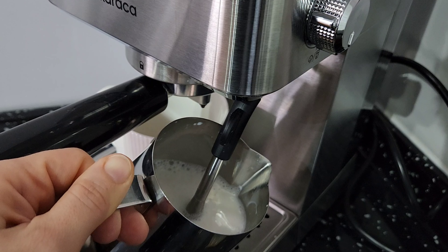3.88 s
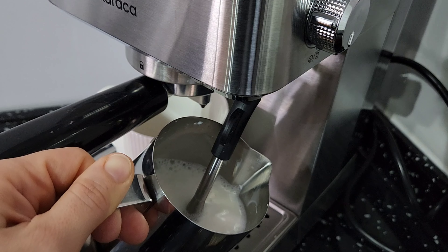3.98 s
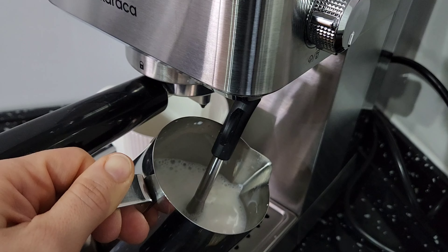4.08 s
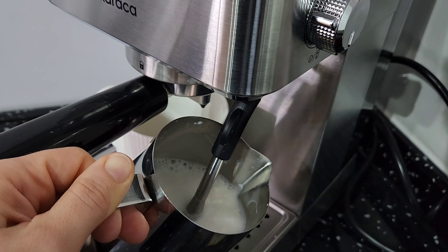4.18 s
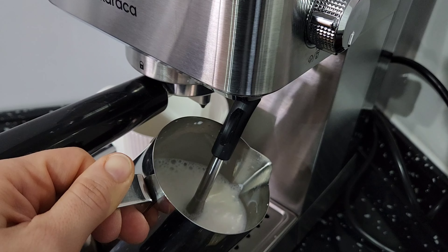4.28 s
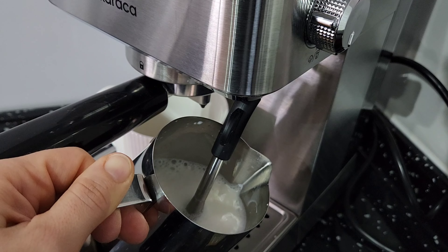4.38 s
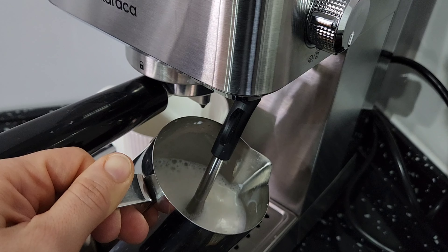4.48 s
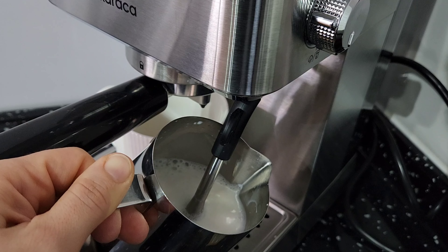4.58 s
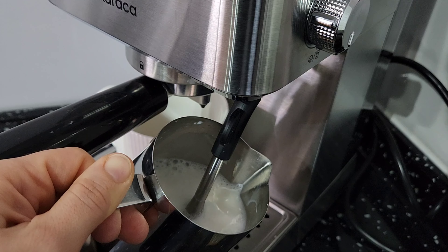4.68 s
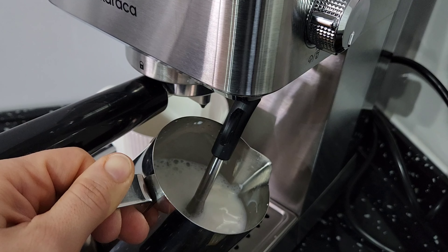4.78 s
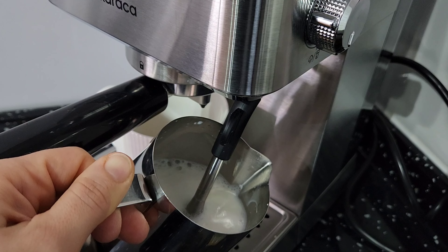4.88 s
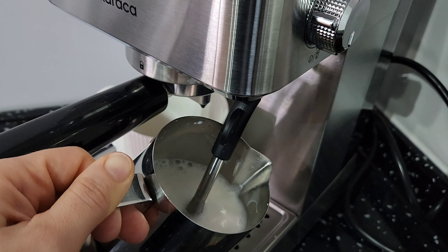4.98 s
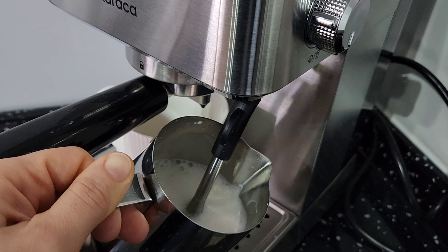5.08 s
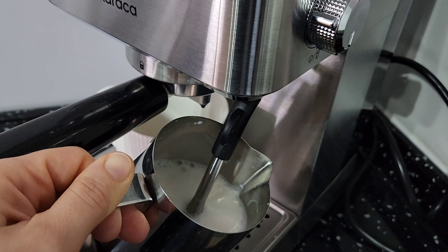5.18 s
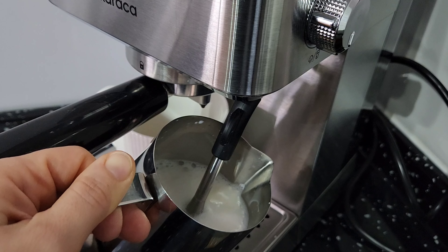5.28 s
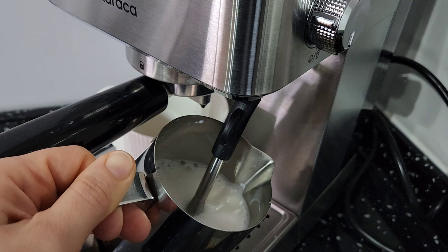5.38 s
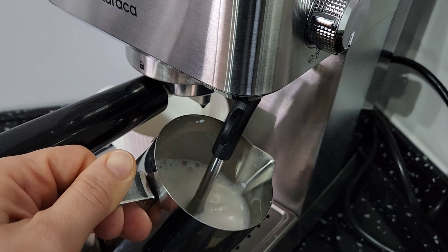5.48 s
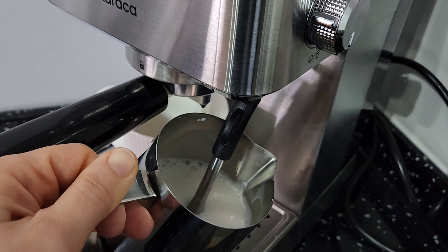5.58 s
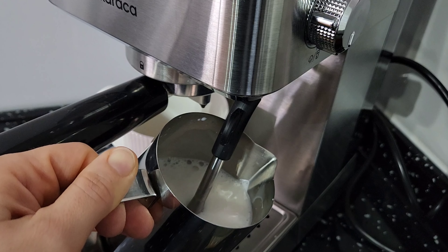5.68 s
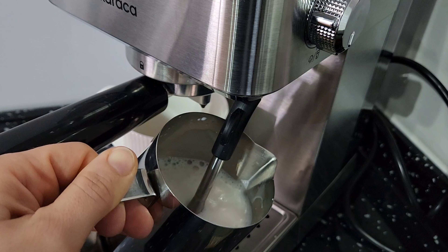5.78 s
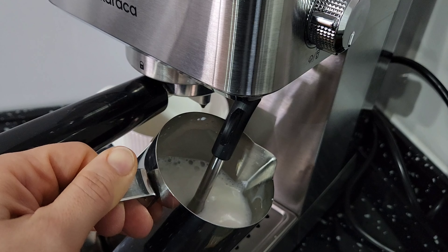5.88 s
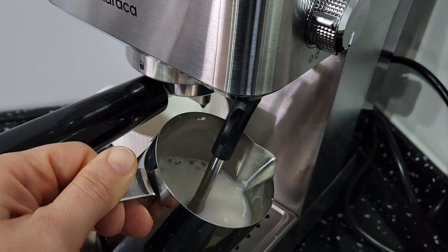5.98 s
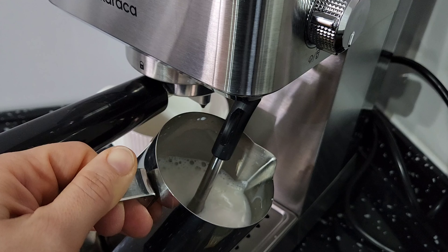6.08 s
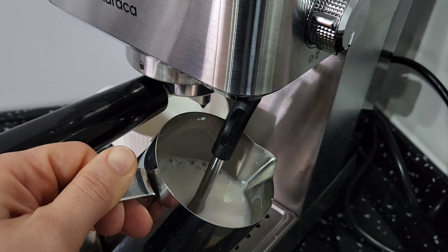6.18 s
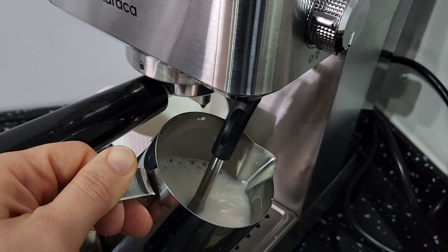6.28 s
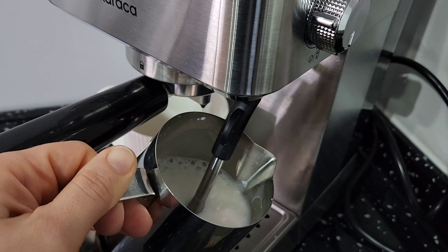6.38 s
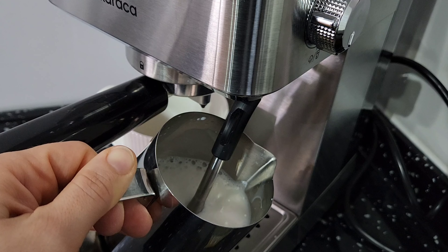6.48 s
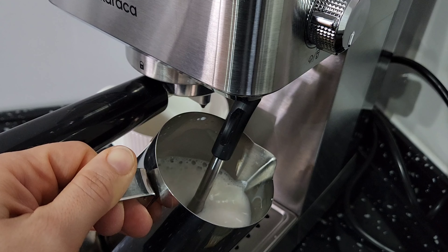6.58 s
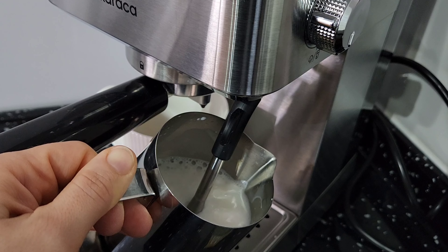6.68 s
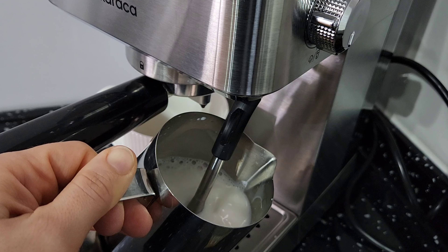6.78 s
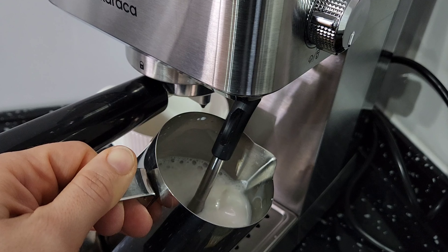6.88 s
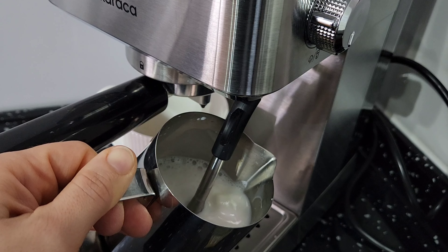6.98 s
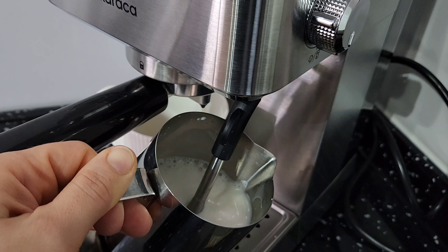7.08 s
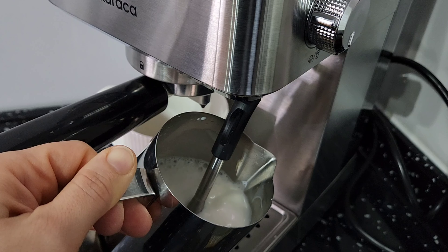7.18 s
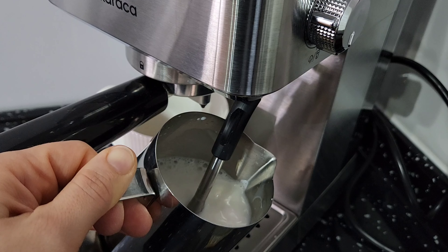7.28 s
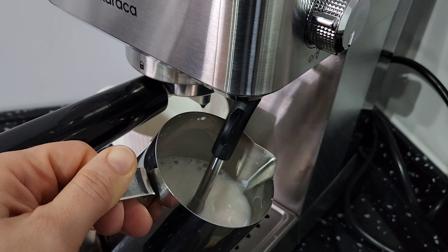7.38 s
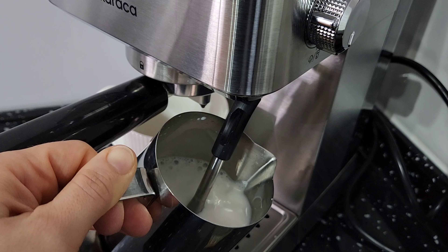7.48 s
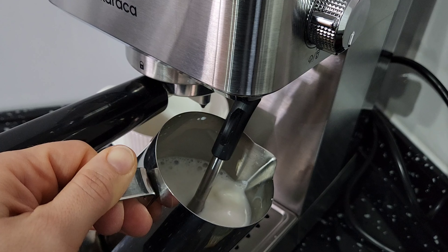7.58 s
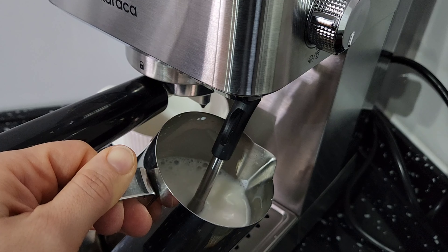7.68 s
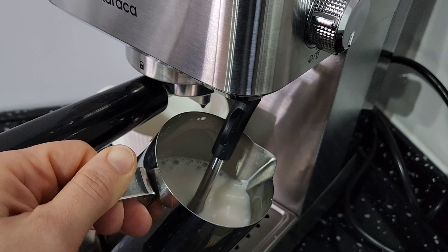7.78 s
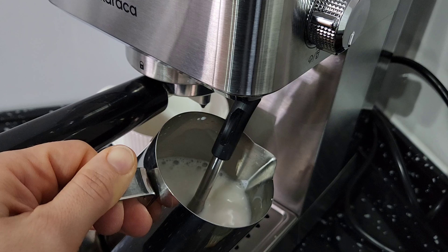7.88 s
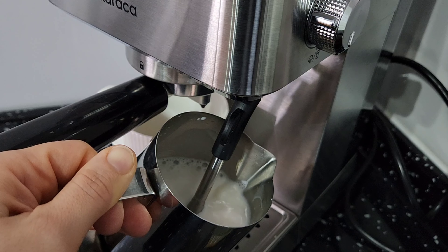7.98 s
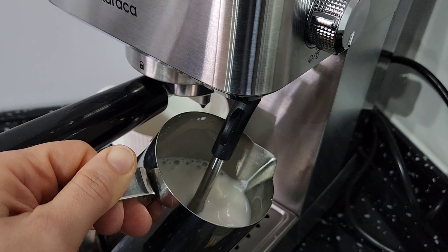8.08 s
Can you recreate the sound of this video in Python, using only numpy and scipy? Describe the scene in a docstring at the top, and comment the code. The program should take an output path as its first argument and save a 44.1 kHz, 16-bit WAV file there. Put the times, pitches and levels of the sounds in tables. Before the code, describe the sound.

Close stereo sound of a steam wand in a small steel milk pitcher in a kitchen, already running and never stopping. From 0 to 1.7 seconds a hollow roar around one kilohertz, a breathy screech near two kilohertz, bright sizzle and sharp nozzle hiss mix, flickering unevenly, with bubble crackle swelling around 0.9. From 1.7 to 3 the tip nears the surface: the roar thins, bubbles tear in, and short squeals pop near 2.2 and 2.55. At about 3.1 a brief rough spit of bright free air bursts out while the milk drops quieter. Squeaky flurries follow to 3.5, and another squeal marks 4.06. From 4 to 8.1 the sunken jet is lower in pitch and fuller, with a stronger, purer whistle around 7 and churning froth growing. Small dips interrupt the flow. Underneath, faint low hum, dull pump knocks about six per second and soft room rumble.

```python
"""In a kitchen, close by, a steam wand froths milk in a steel pitcher.
Collapsing steam roars in the pitcher's air modes, screeches near 2 kHz and sizzles above; all are filtered noise.
The tip rises, tears in bubbles (short rings), spits near 3.1 s as spectrally shaped noise, then sinks.
Under it a machine hums and its pump knocks, as sines, over faint room noise."""
import sys
import numpy as np
from scipy import signal
from scipy.fft import rfft, irfft, next_fast_len
from scipy.io import wavfile
from scipy.ndimage import uniform_filter1d, minimum_filter1d

SR = 44100
rng = np.random.default_rng(int(sys.argv[2]) if len(sys.argv) > 2 else 0)


def transcribe(signal):
    """Save signal, clipped to [-1, 1], as a 16-bit WAV file at the path in sys.argv[1]."""
    frames = np.atleast_2d(signal).T
    limited = np.clip(frames, -1, 1)
    pcm = np.round(limited * 32767).astype(np.int16)
    wavfile.write(sys.argv[1], SR, pcm)


N = 358634
TIME, HZ = np.arange(N) / SR, np.fft.rfftfreq(next_fast_len(N), 1 / SR)

# Levels in the tables are relative: trims, swells and filters act on them later.
# Wand and milk. Each row: time in seconds, how far the milk rolls 0-1, nearness of the tip to the surface 0-1,
# lean of the roar to its upper mode in dB.
WAND = [(0, 0.01, 0.1, 0.5), (.8, 0.06, 0.13, -2), (1.75, 0.08, 0.1, 1), (2.0, 0.51, 0.6, 1),
        (2.6, 0.74, 0.65, 1), (3.05, 1, 0.83, 0.5), (3.4, 0.98, 0.76, -1.5), (3.75, 1, 0.47, -0.5),
        (4.3, 1, 0.13, -1.5), (5.2, 0.99, 0.25, 0.5), (6.0, 0.98, 0.01, 2), (7.0, 0.99, 0.14, -0.5),
        (8.13, 1, 0.42, -1.5)]
# Sunken jet. Each row: time in seconds, low roar in dB, churn of the froth in dB.
ROAR = [(0, -19.5, -23), (.55, -18.5, -24), (.95, -21, -29), (1.4, -18, -23.5), (1.72, -22, -25),
        (2.0, -25, -27), (3.25, -25.5, -28), (3.9, -21, -20), (4.8, -23, -27), (5.4, -22, -27),
        (6.0, -20.5, -18.5), (7.1, -20, -21.5), (8.13, -20, -13)]
# Air modes of the pitcher. Each row: pitch over calm milk in Hz, pitch over rolling milk in Hz, width in Hz,
# level calm in dB, level rolling in dB.
PITCHER_MODES = [(995, 885, 44, 0.5, -4.5), (1187, 1000, 22, -5.5, -5.5), (1348, 1172, 56, -3, 2.5)]
# Splash modes near the surface. Each row: pitch in Hz, width in Hz, level in dB.
SPLASH_MODES = [(871, 93, 1.5), (1101, 156, 5), (1370, 99, 4)]
# The jet heaves the milk. Each row: centre in seconds, length in seconds, change of the roar in dB.
HEAVES = [(.153, 0.058, 4), (.563, .04, 6), (1.593, .045, 2.5), (1.763, 0.095, 6.5), (2.963, 0.055, 2.5),
          (4.43, .03, 4.5), (5.213, 0.027, 5), (5.613, 0.028, 4), (5.997, 0.048, 5), (6.29, .03, 3),
          (7.053, 0.037, 3)]
# Steam collapsing in the milk. Each row: time in seconds, screech in dB, sizzle in dB.
COLLAPSE = [(0, -20.5, -14.5), (1.0, -19.5, -16), (1.65, -25.5, -17), (2.2, -18, -18.5), (2.9, -24.5, -21),
            (3.45, -19, -17), (3.72, -23.5, -19.5), (3.95, -15, -17), (4.85, -15, -16), (5.4, -13, -12),
            (6.3, -15.5, -18), (6.95, -12, -18), (7.3, -15.5, -18), (8.13, -16.5, -20)]
# Screech pitch. Each row: time in seconds, pitch in Hz, how firmly it locks into one tone 0-1.
SCREECH_PITCH = [(0, 2000, 0.14), (.7, 2076, 0.56), (2.2, 2005, 0.3), (3.5, 1985, 0.3), (3.85, 1930, 0.31),
                 (5.3, 1932, 0.31), (5.75, 1987, 0.01), (6.5, 1965, 0.24), (6.75, 1968, 0.52),
                 (7.1, 1964, 0.57), (8.13, 1945, .3)]
# Loose screech. Each row: offset from the screech pitch in Hz, width in Hz, level in dB.
SCREECH_BANDS = [(0, 46, -7), (-72, 62, -1), (60, 165, 1.5), (0, 240, -11)]
# Upper air modes that fizz. Each row: pitch in Hz, width in Hz, level in dB.
SIZZLE_MODES = [(2300, 69, 1), (2464, 240, 3), (2544, 61, 6), (2630, 117, 3), (2790, 127, 4.5)]
# Flurries of collapsing steam. Each row: centre in seconds, length in seconds, change of the screech in dB,
# change of the sizzle in dB.
FLURRIES = [(.393, 0.036, 4, 1), (.95, 0.03, 6, 5), (1.027, 0.06, -0.5, 5), (1.407, .05, 5, 3),
            (1.54, 0.12, 1, 8.5), (1.923, 0.045, 1, 3.5), (2.193, .06, -12, 9.5), (2.44, .05, 2, 3),
            (3.173, .04, 9.5, -5), (3.26, 0.025, 6, -8), (3.5, .07, 5, 6), (4.063, 0.028, 6, -3),
            (4.677, 0.053, 6.5, -8), (4.897, .04, 7.5, -10), (5.617, 0.048, 0.5, 6), (6.003, .07, 2, 3.5),
            (6.927, .07, 0, 4), (7.5, 0.085, 7, 1), (8.037, 0.044, 5, -8)]
# Large steam pockets. Each row: centre in seconds, level in dB, pitch in Hz, length in seconds.
POCKETS = [(1.76, -13.5, 2740, .02), (1.93, -20, 2600, 0.01), (2.162, -9, 2620, .016),
           (2.19, -9, 2036, 0.032), (2.543, -22, 2440, 0.011), (2.558, -6, 2560, 0.0088),
           (3.166, -23, 1970, .012), (3.178, -10, 1960, 0.039), (3.21, -10, 1915, .016),
           (3.26, -18, 2045, 0.015), (3.421, -9, 2010, 0.021), (3.479, -5, 2510, 0.01),
           (4.06, -2, 1990, 0.021)]
# Air drawn in as bubbles. Each row: time in seconds, level in dB.
BUBBLE_LEVEL = [(0, -32), (.55, -36), (.9, -19.5), (1.5, -30.5), (1.8, -24), (2.3, -22.5), (2.9, -20.5),
                (3.15, -30), (4.2, -22.5), (4.6, -20), (5.7, -25), (8.13, -26)]
# Bubble size. Each row: time in seconds, middle pitch in Hz.
BUBBLE_PITCH = [(0, 3500), (1.5, 3144), (2.5, 3576), (4.6, 3404), (6.2, 3940), (8.13, 3710)]
# The tip gulps air. Each row: centre in seconds, length in seconds, change of the bubbles in dB.
GULPS = [(.253, .05, 7), (.857, 0.097, 6.5), (1.27, .05, 10), (1.64, 0.046, 9), (2.137, .035, 0),
         (2.367, 0.029, 10.5), (2.887, 0.072, -2.5), (3.3, 0.034, 6), (4.56, 0.041, 3.5), (7.353, 0.039, 6)]
# Churn of the froth. Each row: pitch in Hz, width in Hz, level in dB.
CHURN_MODES = [(1484, 127, -3), (1599, 84, -0.5), (1740, 57, 2.5), (1880, 120, -0.5)]
# Steam flow at the nozzle. Each row: time in seconds, hiss in dB, fine spray in dB.
JET = [(0, -20.5, -26.5), (.5, -20, -25), (1.0, -21.5, -27), (2.1, -23, -28), (2.55, -21, -36),
       (3.0, -26, -29), (3.4, -22.5, -25.5), (3.65, -25, -35), (4.1, -20, -31), (4.45, -23.5, -35),
       (4.95, -18.5, -28), (5.35, -24.5, -30), (5.75, -20, -29.5), (7.6, -20.5, -29), (8.13, -21, -28.5)]
# Colour of the nozzle hiss. Each row: frequency in Hz, density in dB.
HISS_COLOUR = [(600, -22), (900, -12), (2900, -0.5), (3500, -5), (4050, 0.5), (4550, -3.5), (5550, 6),
               (6700, -6), (7450, -2), (8300, -11), (9400, -9), (10900, -13), (16000, -23.5)]
# Colour of the fine spray. Each row: frequency in Hz, density in dB.
SPRAY_COLOUR = [(5000, -14), (9000, 5.5), (10200, 3), (10900, -5), (11600, 1.5), (13300, -4), (14500, -5),
                (15700, -12)]
# The steam flow falters. Each row: centre in seconds, length in seconds, change of the hiss in dB,
# change of the sound in the milk in dB.
FALTERS = [(.913, 0.1, -5.5, -1.5), (1.293, 0.031, -6, -5.5), (1.69, 0.048, 2.5, -2),
           (1.823, 0.056, -5, -5), (1.98, 0.02, -5, -5), (2.49, 0.026, -8, -5), (3.195, .018, 0, -5),
           (4.287, 0.022, -8, -10), (5.273, .03, 2.5, -4.5), (5.447, 0.035, 0.5, -5.5),
           (6.14, .04, 0.5, -6), (6.52, 0.034, -6, 0), (7.167, 0.03, -2, -5.5), (7.717, 0.07, -4, -2.5)]
# The nozzle spurts. Each row: centre in seconds, length in seconds, change of the hiss in dB.
SPURTS = [(.473, .04, 1.5), (1.103, 0.02, 0), (2.44, .038, 3.5), (2.52, 0.027, 3), (2.6, 0.025, -2),
          (2.777, 0.025, 6.5), (3.413, 0.035, 5), (3.553, 0.036, 4), (5.647, 0.041, 2.5),
          (5.78, 0.029, 2.5), (6.99, 0.032, 1)]
# The tip breaks the surface. Each row: centre in seconds, length in seconds, share of the jet in free air 0-1.
BREAKS = [(3.101, 0.059, 0.68), (3.13, 0.03, 0.62), (3.41, 0.13, 0.07)]
# Colour of the spit. Each row: frequency in Hz, density in dB.
SPIT_COLOUR = [(2500, -40), (3600, 0), (4500, 4.5), (5600, -14), (7500, 5), (9000, 4), (11000, 1),
               (13300, 8), (15700, 3.5)]
# Echo off the milk cancels one pitch. Each row: time in seconds, pitch in Hz, depth 0-1.
ECHO_NULL = [(0, 1500, 1), (1.8, 1380, .9), (2.1, 1470, 0.8), (3.5, 1120, 0), (3.8, 1249, 1),
             (5.4, 1400, 1), (7.0, 1330, .05)]
# Pump strokes. Each row: time in seconds, level in dB.
PUMP_STROKES = [(0.171, -41), (0.279, -39), (0.401, -43), (0.588, -39), (0.739, -43), (0.946, -40),
                (1.074, -38), (1.225, -42), (1.357, -39), (1.511, -36), (1.64, -32.5), (1.815, -41),
                (1.976, -34), (2.144, -35.5), (2.3, -41), (2.517, -40), (2.68, -36.5), (2.885, -39),
                (3.079, -38), (3.225, -41), (3.392, -40), (3.597, -39), (3.736, -39), (3.906, -35),
                (4.039, -40), (4.211, -36.5), (4.405, -40), (4.59, -40), (4.723, -36), (4.843, -36),
                (5.023, -38), (5.204, -41), (5.32, -37), (5.481, -35), (5.636, -37), (5.776, -36),
                (5.955, -46), (6.187, -41), (6.356, -38), (6.49, -39), (6.629, -38), (6.918, -38),
                (7.047, -38), (7.202, -37.5), (7.384, -40), (7.618, -38), (7.858, -38), (8.023, -40)]
# Casing modes. Each row: pitch in Hz, level in dB, decay by 60 dB in seconds.
CASING_MODES = [(162, -8, 0.074), (226, 2, 0.14), (259.8, 3.5, 0.21), (283.8, 5, 0.18), (388, -1, 0.12)]
# Machine hum. Each row: time in seconds, level in dB.
HUM_LEVEL = [(0, -45.5), (.8, -49.5), (1.1, -46.5), (3.5, -44.5), (6, -44.5), (8.13, -46)]
# Colour of the kitchen air. Each row: frequency in Hz, density in dB.
ROOM_COLOUR = [(20, -3), (33, -5), (47, 6), (65, -1), (130, 3.5), (170, -3), (220, 8.5), (340, -11),
               (520, -36), (650, -33), (900, 11), (2000, -50)]
# Low rumble swells. Each row: centre in seconds, length in seconds, level in dB.
RUMBLES = [(.45, 1.0, -49), (1.85, 0.69, -44), (2.599, 0.18, -53), (3.25, .4, -47), (4.097, 0.19, -53),
           (7.72, .13, -47)]
# Two microphone ports. Each row: frequency in Hz, likeness 0-1, left over right in dB, left lead in radians.
PORTS = [(550, .85, 1, 0), (770, .96, 6, .1), (890, .96, -1, .1), (1000, .95, 5, .7), (1170, .96, 0, .1),
         (1400, .9, 0, .7), (1600, .7, -4, 1.6), (1850, .85, 8, .4), (2030, .92, 3, .2), (2220, .5, 1, -1),
         (2420, .88, 5, 0), (2750, .75, -1, .9), (3400, .65, 0, 2.1), (4300, .45, -1.5, 2.5),
         (5200, .5, -1, 2.6), (6000, .3, 0, 1.6), (7500, .35, 1.5, 1.5), (10000, .25, -1, 1.7),
         (16000, .25, 0, 1.6)]


def amp(db):
    """Decibels to gain."""
    return 10 ** (np.asarray(db) / 20)


def unit(x):
    """Scales to rms 1."""
    return x / np.sqrt(np.mean(x ** 2) + 1e-20)


def curves(rows):
    """Each column of a time table, at every sample."""
    s, *columns = np.transpose(rows)
    return [np.interp(TIME, s, c) for c in columns]


def spectra(rows):
    """Each column of a frequency table, at every bin, on a log frequency axis."""
    hz, *columns = np.transpose(rows)
    return [np.interp(np.log(HZ + 1), np.log(hz + 1), c) for c in columns]


def tip_nearness():
    """Nearness of the tip to the surface, 0-1."""
    return np.clip(curves(WAND)[1], 0, 1)


def resonances(modes):
    """Gain of a set of steep-sided resonances, summed in power."""
    power = sum((amp(db) / (1 + (2 * (HZ - hz) / width_hz) ** 2)) ** 2 for hz, width_hz, db in modes)
    return np.sqrt(power)


def noise(gain, channels=2):
    """Unrelated noises of rms 1 with the given colour."""
    real, imag = rng.standard_normal((2, channels, len(HZ)))
    return unit(irfft((real + 1j * imag) * gain)[:, :N])


def slow_noise(rate_hz):
    """One noise of rms 1 below the given rate."""
    return noise(1 / (1 + (HZ / rate_hz) ** 4), channels=1)


def flutter(rate_hz, depth_db):
    """A random gain of mean power 1 that wanders up to the given rate."""
    return unit(amp(depth_db * slow_noise(rate_hz)))


def wander(depth_db, rate_hz=9):
    """A random drift of level, in dB."""
    return depth_db * slow_noise(rate_hz)[0]


def swells(events):
    """Bell-shaped swells (centre, length at half height, heights), one summed curve per height column."""
    s, length_s, *heights = np.transpose(events)
    half_lengths = np.minimum(2 * abs(TIME - s[:, None]) / length_s[:, None], 10)
    return np.array(heights) @ np.exp(-np.log(2) * half_lengths ** 2)


def add(mix, s, sound):
    """Lays a sound into a track at time s."""
    part = mix[max(round(s * SR), 0):][:len(sound)]
    part += sound[:len(part)]


def whistle(hz, width_hz, steady=0.047):
    """A narrow turbulent resonance on a pitch curve; feedback to the jet evens out its swells."""
    turn = np.exp(2j * np.pi * np.cumsum(hz) / SR)
    slow = noise(1 / (1 + (2 * HZ / width_hz) ** 2), channels=4)
    swell = slow[:2] + 1j * slow[2:]
    evened = swell / (1 + abs(swell) ** 2) ** steady
    return unit((evened * turn).real)


def patchy(x, depth_db, span_hz, span_s):
    """Shifting foam lifts and shades small patches of the spectrum."""
    z = signal.stft(x, nperseg=512)[2]
    field = rng.standard_normal(z.shape[:0:-1]).T
    for axis, span in enumerate([span_hz * 512 / SR, span_s * SR / 256]):  # in bins, in frames
        kernel = np.exp(-(np.arange(-40, 41) / span) ** 2)
        field = signal.fftconvolve(field, np.expand_dims(kernel, 1 - axis), "same", axes=axis)
    gain = unit(amp(depth_db * unit(field)))
    return signal.istft(z * gain, nperseg=512)[1][:, :N]


def reflect(x, t60_s, wet_db):
    """Steel walls and counter answer with a short noise tail, another on each path; path 0 has the direct sound."""
    t = np.arange(SR // 4) / SR
    tail = rng.standard_normal((2, len(t))) * np.exp(-np.log(1000) * t / t60_s)
    tail *= amp(wet_db) / np.linalg.norm(tail, axis=1, keepdims=True)
    tail[0, 0] += 1
    return signal.oaconvolve(x[None], tail / np.linalg.norm(tail[0]), axes=1)[:, :N]


def roar(level_db, ring_db=-2.0, splash_db=-1, body_db=-33):
    """The sunken jet drives the air modes, which sink as froth builds; near the surface they blur into a splash."""
    rolling, surface = np.clip(curves(WAND)[0], 0, 1), tip_nearness()
    lean_db = curves(WAND)[2]
    sunken = 0
    for k, (calm_hz, rolling_hz, width_hz, calm_db, rolling_db) in enumerate(PITCHER_MODES):
        mode_db = calm_db + (rolling_db - calm_db) * rolling + (k - 1) * lean_db
        sunken = sunken + amp(mode_db) * whistle(calm_hz + (rolling_hz - calm_hz) * rolling, width_hz)
    splash = noise(resonances(SPLASH_MODES))
    air = np.sqrt(1 - surface) * amp(ring_db) * sunken + np.sqrt(surface) * amp(splash_db) * splash
    # the small pitcher radiates little below its lowest air mode
    air = signal.sosfilt(signal.butter(6, 740, "highpass", fs=SR, output="sos"), air)
    body = noise(resonances([(507, 79, 5), (610, 62, -10.0)]))
    body *= amp(body_db) * (0.098 + 0.73 * rolling) * np.sqrt(1 - surface)
    return amp(level_db) * (air + body) * flutter(rate_hz=33, depth_db=.5)


def screech(level_db, locked_width_hz=42):
    """The steam pocket at the tip pulses near one pitch, and at times locks into a purer whistle."""
    pitch_hz, locked = curves(SCREECH_PITCH)
    locked = np.clip(locked, 0, 1)
    loose = unit(sum(amp(db) * whistle(pitch_hz + offset_hz, width_hz)
                     for offset_hz, width_hz, db in SCREECH_BANDS))
    tone = np.sqrt(1 - locked) * loose + np.sqrt(locked) * whistle(pitch_hz, locked_width_hz)
    return amp(level_db) * tone * flutter(rate_hz=55, depth_db=1.5)


def ringing(modes, level_db, unrest_db):
    """Steam collapses in uneven bursts and keeps a group of resonances ringing."""
    return amp(level_db) * noise(resonances(modes)) * flutter(rate_hz=35, depth_db=unrest_db)


def sizzle(level_db, trim_db=-2.0):
    """Steam collapsing under the surface fizzes in the upper air modes, patchy with foam."""
    fizz = ringing(SIZZLE_MODES, level_db + trim_db, unrest_db=1.33)
    return patchy(fizz, depth_db=3.0, span_hz=100, span_s=0.03)


def bubbles(level_db, count=14000, scatter=0.1977, cycles=7, rise=0.017, spread_db=2.0,
            trim_db=-1.5, sunken_db=-5.0):
    """Torn-in air bubbles ring briefly at the pitch of their size, rising a little, with a phase per path."""
    t, out = np.arange(768) / SR, np.zeros((2, N))
    when, size, strength, place = rng.random((count, 4)).T
    starts_s = when * N / SR
    middle_hz = np.interp(starts_s, *np.transpose(BUBBLE_PITCH))
    pitches_hz = middle_hz * np.exp(scatter * np.sqrt(3) * (2 * size - 1))
    gains = amp(spread_db * np.minimum(-np.log(strength), 3))
    turns = np.exp(2j * np.pi * place)
    for s, hz, gain, turn in zip(starts_s, pitches_hz, gains, turns):
        age = t * hz / cycles
        ring = gain * age * np.exp(-age + 2j * np.pi * hz * t * (1 + rise * age / 10))
        add(out[0], s, ring.imag)
        add(out[1], s, (ring * turn).imag)
    return amp(level_db + trim_db + sunken_db * (0.5 - tip_nearness())) * unit(out)


def churn(level_db, trim_db=-2.47):
    """Churning froth keeps a group of resonances ringing unevenly."""
    return ringing(CHURN_MODES, level_db + trim_db, unrest_db=2.0)


def pockets(trim_db=-1):
    """Each large steam pocket swells and dies as a short squeal while it collapses."""
    out = np.zeros(N)
    for s, db, hz, length_s in POCKETS:
        t = np.arange(round(length_s * SR)) / SR
        squeal = np.hanning(len(t)) * np.sin(2 * np.pi * (hz * t + rng.random()))
        add(out, s - length_s / 2, np.sqrt(2) * amp(db + trim_db) * squeal)
    return reflect(out, t60_s=0.023, wet_db=-4)


def hiss(hiss_db, spray_db, wall_db=-13):
    """Nozzle hiss and fine spray, bounced a few times inside the steel pitcher."""
    jet = amp(hiss_db + 1.5) * noise(amp(spectra(HISS_COLOUR)[0]))
    jet += amp(spray_db - 2.5) * noise(amp(spectra(SPRAY_COLOUR)[0]))
    walls = np.zeros((2, SR // 100))
    delays = rng.integers(SR // 1000, SR // 100, size=(2, 6))  # 1 to 10 ms
    signs = rng.choice([-1, 1], size=(2, 6))
    np.put_along_axis(walls, delays, amp(wall_db) * signs, axis=1)
    walls[:, 0] = 1
    jet = signal.oaconvolve(jet, walls / np.linalg.norm(walls[0]), axes=1)[:, :N]
    return patchy(jet, depth_db=2.5, span_hz=233, span_s=0.013) * flutter(rate_hz=75, depth_db=0.7)


def spit(free):
    """The tip out of the milk blows a rough burst of noise into free air."""
    burst = noise(amp(spectra(SPIT_COLOUR)[0]))
    return amp(-10.5) * free * burst * flutter(rate_hz=170, depth_db=-1.0)


def cancel(x, width_hz=70):
    """The echo off the milk cuts a narrow notch that moves with the surface."""
    hz, depth = curves(ECHO_NULL)
    turn, r = np.exp(2j * np.pi * np.cumsum(hz) / SR), np.exp(-np.pi * width_hz / SR)
    band = 2 * (turn * signal.lfilter([1 - r], [1, -r], x / turn)).real
    return x - np.clip(depth, 0, 1) * band


def shallow_dip(x, dip_hz=3380, width_hz=520, depth=0.19):
    """A shallow dip near 3.4 kHz in the steam sound, shallower as the tip nears the surface."""
    band = signal.lfilter(*signal.iirpeak(dip_hz, dip_hz / width_hz, fs=SR), x)
    return x - depth * (1 - tip_nearness()) * band


def machine(hum_hz=100, knock_db=-5.5, swell_s=0.015, lead_s=0.012):
    """Pump strokes ring the casing modes, with reflections, over a steady-pitched hum."""
    t, knocks = np.arange(SR // 5) / SR, np.zeros(N)
    onset = 2 * (1 - np.exp(-(t / swell_s) ** 2))
    for s, db in PUMP_STROKES:
        casing = 0
        for hz, level_db, t60_s in CASING_MODES:
            decay = amp(level_db) * np.exp(-np.log(1000) * t / t60_s)
            casing = casing + decay * np.sin(2 * np.pi * (hz * t + rng.random()))
        add(knocks, s - lead_s, amp(db + knock_db) * casing * onset)
    hum = np.sqrt(2) * amp(curves(HUM_LEVEL)[0]) * np.sin(2 * np.pi * hum_hz * TIME)
    echoes = amp(-8) * reflect(knocks, t60_s=0.18, wet_db=3)
    return knocks + echoes + hum * flutter(rate_hz=7.6, depth_db=0.2)


def room(air_db=-44, rumble_floor_db=-63, rumble_trim_db=-2, apart_db=-12):
    """Kitchen air and a swelling low rumble, as coloured noise nearly alike at both ports."""
    air = amp(air_db) * noise(amp(spectra(ROOM_COLOUR)[0]))
    swell = swells([(s, length_s, amp(db)) for s, length_s, db in RUMBLES])[0]
    rumble = (amp(rumble_floor_db) + swell) * noise(resonances([(47, 24, -6), (80, 130, -10)]))
    mid, side = air + amp(rumble_trim_db) * rumble
    return np.array([mid + amp(apart_db) * side, mid - amp(apart_db) * side])


def ports(paths):
    """Two microphone ports share the first path and differ by the second; their mean keeps its level."""
    same, balance_db, lead_rad = spectra(PORTS)
    same, tilt = np.clip(same, 0, 1), amp(balance_db / 2)
    near, scattered = rfft(paths, 2 * (len(HZ) - 1))
    right = (same * near + np.sqrt(1 - same ** 2) * scattered) * np.exp(-1j * lead_rad)
    mean = np.sqrt(tilt ** 2 + tilt ** -2 + 2 * same * np.cos(lead_rad)) / 2
    return irfft(np.array([near * tilt, right / tilt]) / mean)[:, :N]


def scene(spray_share=0.29, sizzle_share=0.75, gurgle_share=0.46):
    """Jet in the milk, jet in the air, machine and room; unsteady steam flow moves several layers together."""
    falter_db, sunken_db = swells(FALTERS)
    # near the surface, slopping milk covers and bares the tip
    gurgle_db = tip_nearness() * wander(depth_db=2.0, rate_hz=33)
    nozzle_db = falter_db + swells(SPURTS)[0] + gurgle_share * gurgle_db + wander(depth_db=0.9)
    roar_db, churn_db = curves(ROAR) + sunken_db
    screech_db, sizzle_db = curves(COLLAPSE) + swells(FLURRIES)
    bubble_db = curves(BUBBLE_LEVEL)[0] + swells(GULPS)[0] + gurgle_db + wander(depth_db=2.1)
    hiss_db, spray_db = curves(JET)
    free = sum(share * np.exp(-2 * (2 * (TIME - s) / length_s) ** 4) for s, length_s, share in BREAKS)
    free = np.clip(free, 0, 1)

    milk = roar(roar_db + swells(HEAVES)[0])
    milk += screech(screech_db + sunken_db)
    milk += sizzle(sizzle_db + sizzle_share * sunken_db + gurgle_db)
    milk += bubbles(bubble_db)
    milk += churn(churn_db + wander(depth_db=1.1))
    jet = hiss(hiss_db + nozzle_db, spray_db + spray_share * nozzle_db + wander(depth_db=0.1))
    # while the tip is out of the milk, the milk falls quieter
    steam = shallow_dip(cancel(milk * (1 - 0.86 * free) + jet))
    return ports(steam + spit(free) + pockets()) + machine() + room()


def record(dry, ceiling=1.21, edge_hz=15750):
    """A fast limiter holds peaks to the ceiling, a clip cuts them at full scale, then a low-pass."""
    needed_gain = np.minimum(1, ceiling / (abs(dry).max(axis=0) + 1e-9))
    gain = uniform_filter1d(minimum_filter1d(needed_gain, size=133), size=133)  # 3 ms
    limited = np.clip(dry * gain, -1, 1)
    lowpass = signal.firwin(511, edge_hz, window=("kaiser", 9), fs=SR)
    return signal.oaconvolve(limited, lowpass[None], "same")


dry = scene()
out = record(dry)
transcribe(out)
```